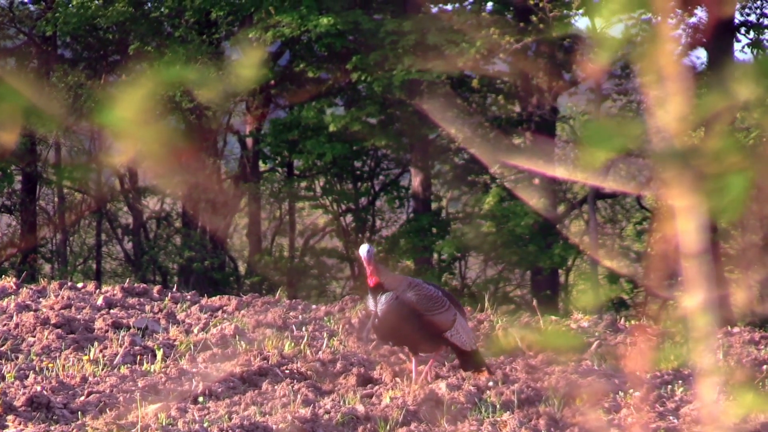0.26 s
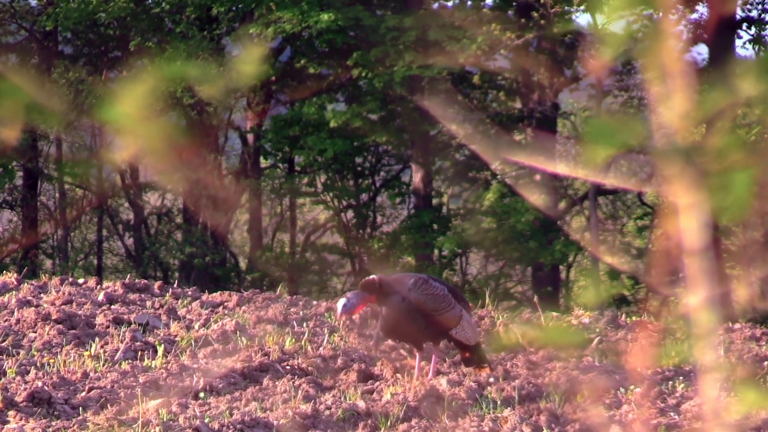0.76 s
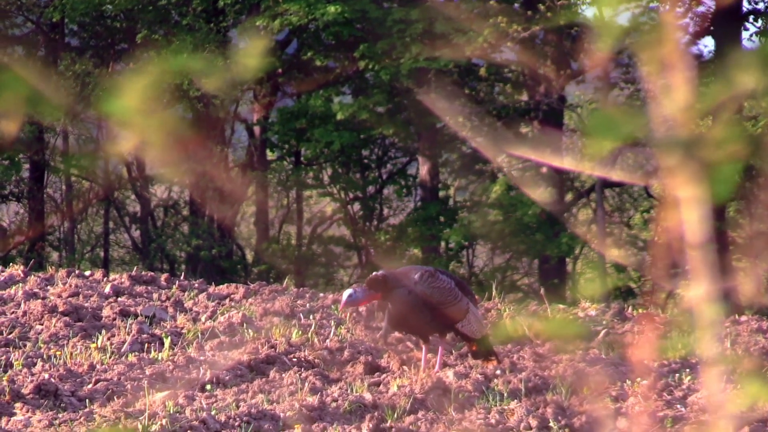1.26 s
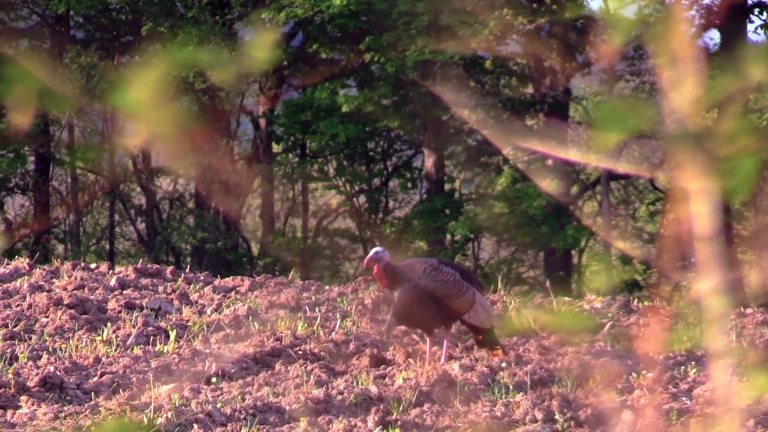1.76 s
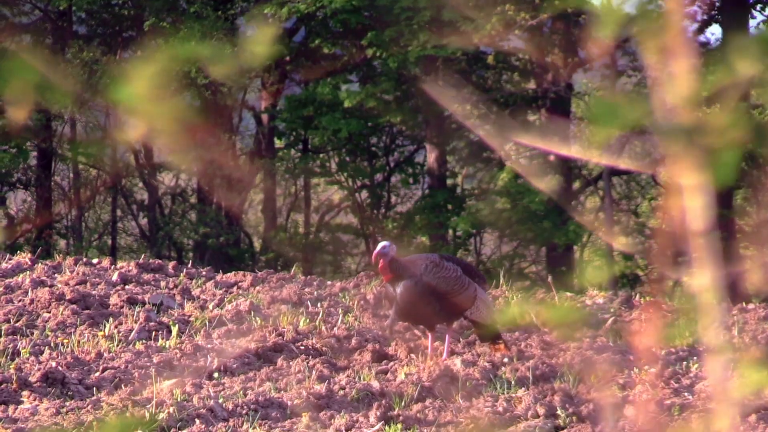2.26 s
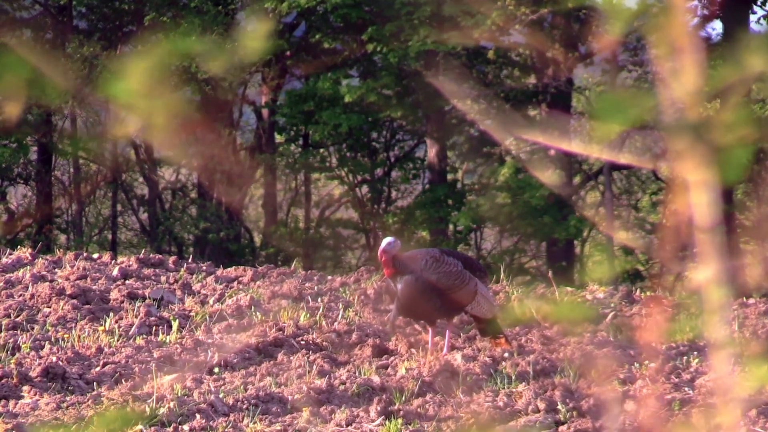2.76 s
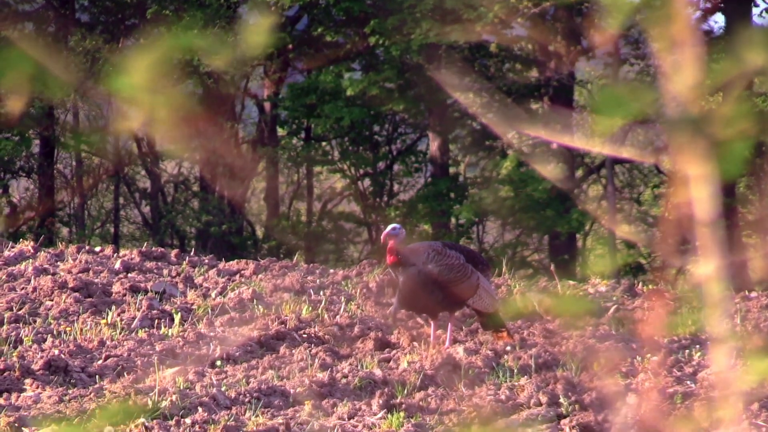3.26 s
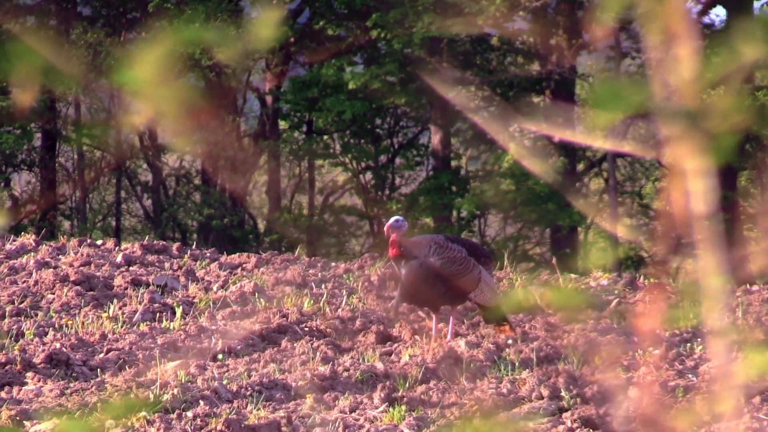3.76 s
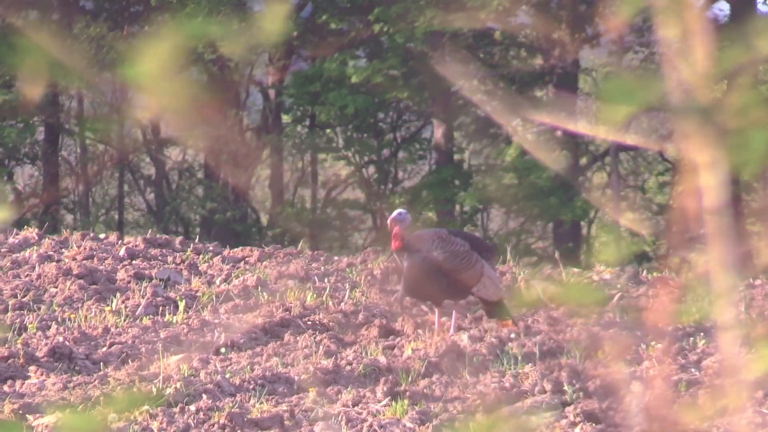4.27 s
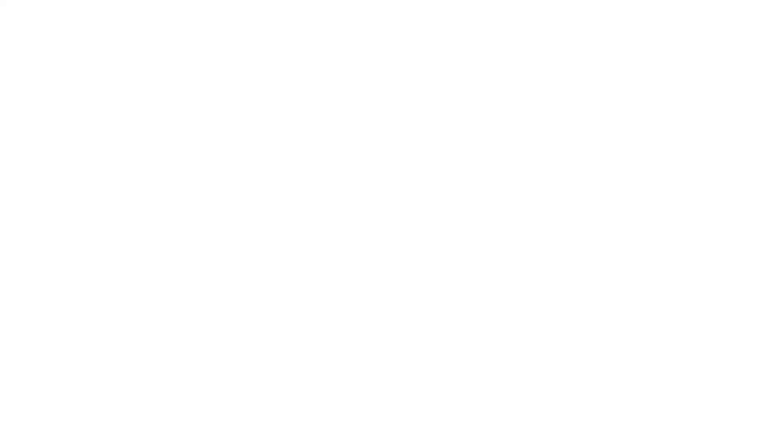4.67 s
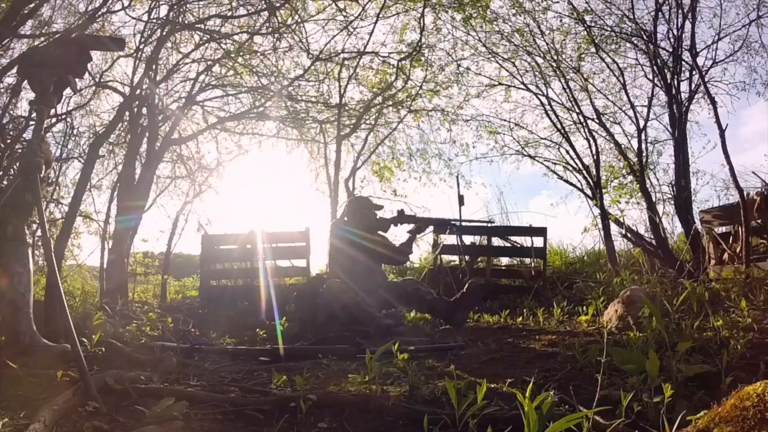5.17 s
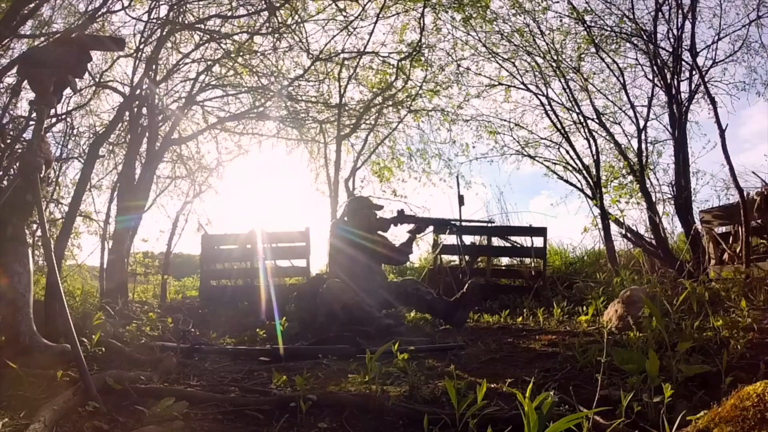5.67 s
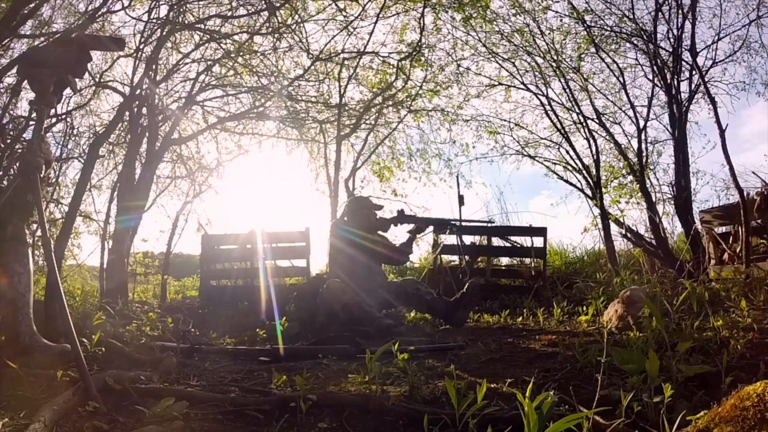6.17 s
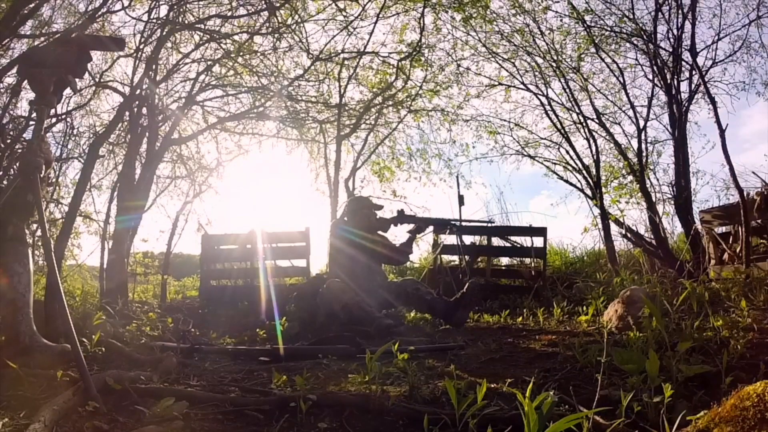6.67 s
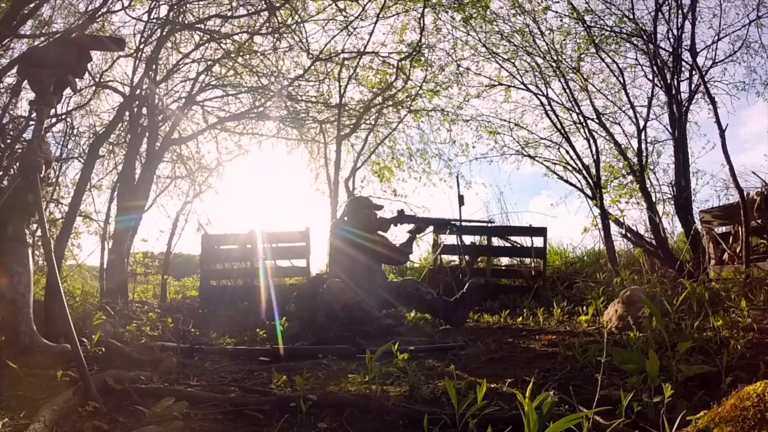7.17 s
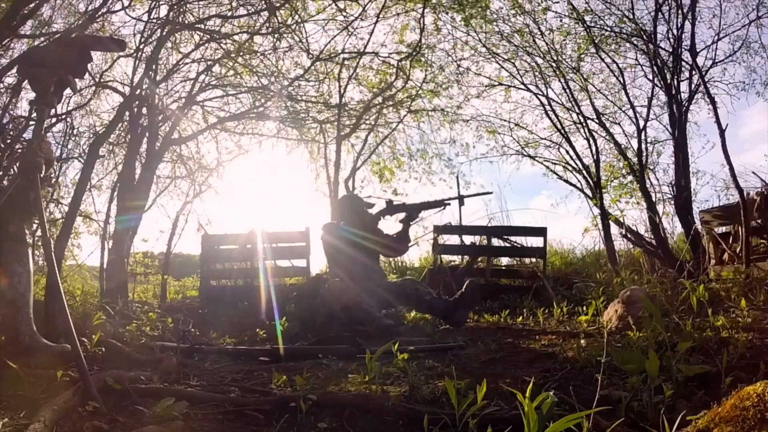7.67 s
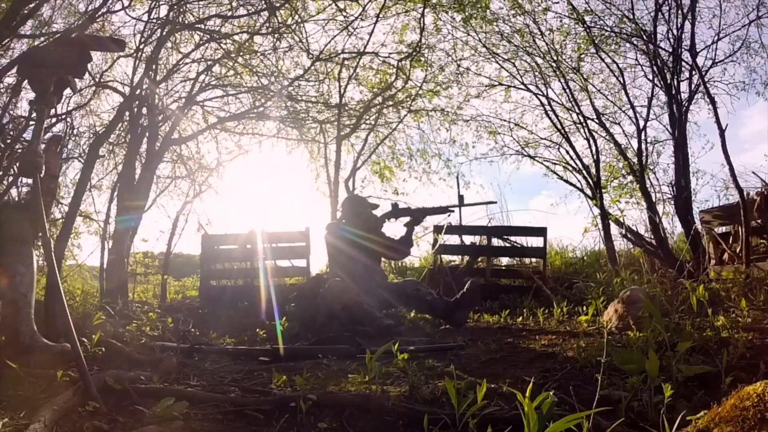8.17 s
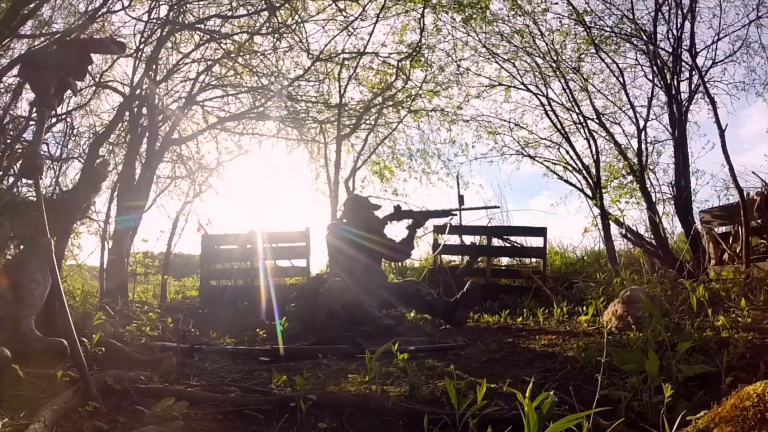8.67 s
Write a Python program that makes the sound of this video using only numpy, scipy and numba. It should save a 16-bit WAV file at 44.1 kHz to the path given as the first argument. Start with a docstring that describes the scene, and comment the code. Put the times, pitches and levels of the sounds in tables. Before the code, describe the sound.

Outdoors, thin birdsong sits behind gusty low wind. A strong turkey gobble starts raspy and breaks into quick fading syllables; a close bird follows with fluty notes and a loud coarse trill. Wind and distant chirps resume, crossfading to dull, steady air noise. Then a very short, dry shot snaps, leaving a near-hush, soft rustle, ringing metallic clicks and thudding handling bumps close to the microphone.

```python
"""Wind rumbles and far songbirds whistle at the edge of a wood; a turkey gobbles, then a near blackbird sings and trills.
The sound fades to a second, hissier spot: a shot cracks, the background sinks and creeps back,
the gun's action clinks and the microphone is jostled. Backgrounds are filtered noise, birdsong is gliding sines,
the gobble and trill are pulse trains through resonances, the clinks are noise that excites damped modes."""
import sys
import numpy as np
from scipy import signal
from scipy.fft import rfft, irfft, next_fast_len
from scipy.io import wavfile
from scipy.ndimage import uniform_filter1d
from numba import njit

SR = 44100
rng = np.random.default_rng(int(sys.argv[2]) if len(sys.argv) > 2 else 0)


def generate_wav(signal):
    """Clip the signal to [-1, 1] and save it as 16-bit WAV at the path in sys.argv[1]."""
    frames = np.transpose(np.atleast_2d(signal))
    scaled = np.clip(frames, -1, 1) * 32767
    pcm = np.round(scaled).astype(np.int16)
    wavfile.write(sys.argv[1], SR, pcm)


N = 393813

# Background of the first spot, sinking under the loud calls and creeping back.
# Each row: time in seconds, murmur level in dB, hiss level in dB.
WOOD = [(0.0, -37.5, -49.5), (0.6, -34, -44.5), (0.72, -38, -51), (1.23, -37, -52.5), (1.55, -33.5, -48),
        (2.12, -29.5, -43), (2.55, -27.5, -41), (2.87, -45, -52.5), (3.11, -50, -54.5), (3.6, -44.5, -55.5),
        (3.93, -33, -47.5), (4.2, -32, -43.5), (4.56, -31.5, -43.5), (5.1, -39, -53)]
# Spectrum of the low murmur at both spots. Each row: frequency in Hz, level in dB per Hz.
MURMUR_COLOUR = [(120, -55), (200, -6), (302, -6), (377, -2.5), (1460, -15.5), (2500, -31.5), (3250, -43),
                 (5500, -120)]


def from_db(db):
    """Decibels are logarithmic: 20 dB is a factor of ten in amplitude."""
    return 10 ** (np.asarray(db) / 20)


def rms_one(x):
    """Normalization of the mean power: scale to rms 1."""
    return x / np.sqrt(np.mean(x ** 2) + 1e-20)


def span(rows):
    """Linear interpolation of breakpoints: first sample, columns per sample, short fade at both ends."""
    s, *columns = np.transpose(rows)
    start, stop = round(s[0] * SR), min(round(s[-1] * SR), N)
    t = np.arange(start, stop) / SR
    fade = np.clip(np.minimum(t - t[0], t[-1] - t) / 0.0013, 0, 1)
    return start, [np.interp(t, s, c) for c in columns], fade


def add(out, start, x):
    """Superposition: mix x into out from sample start on."""
    out[start:start + len(x)] += x[:N - start]


def drift(rate, size):
    """Band-limited random fluctuation: random knots, 2 * rate per second, joined by lines; rms 1."""
    knots = rng.standard_normal(int(size * 2 * rate / SR) + 2)
    return rms_one(np.interp(np.arange(size) * 2 * rate / SR, np.arange(len(knots)), knots))


def coloured(spectrum, size, patchy_db):
    """Spectral shaping: white noise is weighted per frequency, then flickers slowly; rms 1."""
    hz, db = np.transpose(spectrum)
    padded = next_fast_len(size)
    grid = np.maximum(np.arange(padded // 2 + 1) * SR / padded, 1)
    gain = from_db(np.interp(np.log(grid), np.log(hz), db, left=-200, right=-200))
    noise = irfft(rfft(rng.standard_normal(padded)) * gain, padded)[:size]
    return rms_one(noise * from_db(patchy_db * drift(9, size)))


def bed(rows, *colours, patchy_db):
    """Stationary noise under a level envelope: one coloured noise for each level column."""
    out = np.zeros(N)
    start, levels, _ = span(rows)
    for db, colour in zip(levels, colours):
        add(out, start, from_db(db) * coloured(colour, len(db), patchy_db))
    return out


@njit
def resonate(x, hz, width, sr):
    """Second-order resonance of gain 1 whose centre may move; its bandwidth sets the damping."""
    out, r = np.zeros(len(x)), np.exp(-np.pi * width / sr)
    for i in range(2, len(x)):
        drive = (1 - r * r) / 2 * (x[i] - x[i - 2])
        out[i] = drive + 2 * r * np.cos(2 * np.pi * hz[i] / sr) * out[i - 1] - r * r * out[i - 2]
    return out


def modes(x, table, order=1):
    """Modal superposition: parallel resonances of alternating sign; order 2 darkens the valleys."""
    out = 0
    for k, (hz, width, db) in enumerate(table):
        r, ring = np.exp(-np.pi * width / SR), x
        feedforward = [(1 - r * r) / 2, 0, (r * r - 1) / 2]
        feedback = [1, -2 * r * np.cos(2 * np.pi * hz / SR), r * r]
        for _ in range(order):
            ring = signal.lfilter(feedforward, feedback, ring)
        out = out + (-1) ** k * from_db(db) * ring
    return out


def pulses(per_s, rough, weak):
    """Period-doubled excitation: jittered strong-weak pulses plus breath noise that throbs with them."""
    size = len(per_s)
    cycles = np.cumsum(per_s * (1 + .12 * rough * drift(120, size))) / SR
    at = np.flatnonzero(np.diff(np.floor(cycles))) + 1
    shimmer = from_db(2.2 * rough[at] * rng.standard_normal(len(at)))
    train = np.zeros(size)
    train[at] = np.where(np.arange(len(at)) % 2, weak, 1) * shimmer
    breath = rng.standard_normal(size) * np.exp(-3 * (cycles % 1))
    return np.sqrt(1 - rough ** 2) * rms_one(train) + rough * rms_one(breath)


def evened(x, seconds):
    """Short-time power normalization: level held near rms 1."""
    return x / np.sqrt(uniform_filter1d(x ** 2, round(seconds * SR)) + 1e-12)


def sine(hz):
    """Phase is the running integral of frequency, so the pitch may glide."""
    return np.sin(np.cumsum(hz) * 2 * np.pi / SR)


def arch(s, top_s, end_s, db, onset_db, end_db, start_hz, top_hz, end_hz):
    """Note envelope: first sample, gliding pitch and gain with a rounded swell and fall in dB."""
    start, (hz, away, drop_db), fade = span([
        (s, start_hz, 1, onset_db), (top_s, top_hz, 0, onset_db),
        (top_s + 1e-4, top_hz, 0, end_db), (end_s, end_hz, 1, end_db)])
    return start, hz, from_db(db - drop_db * away ** 1.2) * fade


def trees(x, wet_db):
    """Multiple scattering: trunks and leaves add a short, exponentially decaying noise tail."""
    t60_s = 0.15
    t = np.arange(round(.4 * SR)) / SR
    tail = rng.standard_normal(len(t)) * from_db(-60 * t / t60_s) * (t > .004)
    tail = tail / np.sqrt(np.sum(tail ** 2))
    return x + from_db(wet_db) * signal.fftconvolve(x, tail)[:N]


def crack(db, t60, hz):
    """Impulsive noise: a burst around a centre frequency swells within 3.1 ms and decays exponentially."""
    t = np.arange(round(.12 * SR)) / SR
    noise = rng.standard_normal(len(t))
    noise = rms_one(resonate(noise, np.full(len(t), hz * 1.), hz * 0.26, SR)) + 0.046 * noise
    return from_db(db + 2 - 60 * t / t60) * np.minimum(t / 0.0031, 1) * noise


def following(offset_db, share, at_db):
    """Proportional level tracking: offset_db at murmur at_db, then share dB per dB of murmur."""
    return [(s, offset_db + share * (db - at_db)) for s, db, _ in WOOD]


def chorus_level():
    """Distant calls blend into a diffuse field: its level goes dB for dB with the murmur."""
    return following(-36, 1, at_db=-30.5)


def wood_background():
    """Diffuse sound of the first spot: murmur, hiss and a far blur of birds as shaped noise."""
    # Each row: frequency in Hz, level in dB per Hz.
    hiss_colour = [(2650, -34.5), (4500, 1), (6310, -4), (8520, -6), (15200, -7.5), (15900, -22)]
    chorus_colour = [(1060, -26), (1800, 1), (2820, 8), (3340, 5), (4300, -2), (4820, -14.5), (5200, -14),
                     (6760, -92), (11400, -120)]
    out = bed(WOOD, MURMUR_COLOUR, hiss_colour, patchy_db=.6)
    return out + bed(chorus_level(), chorus_colour, patchy_db=1)


def second_background():
    """Diffuse sound of the second spot: shaped noise fades in; echoes and rustle follow the shot."""
    # Noise before the shot. Each row: time in seconds, level in dB.
    blind = [(4.5, -42), (5.2, -29), (7.33, -29)]
    # After the shot. Each row: time in seconds, echoes and rustle in dB, low murmur in dB.
    aftermath = [(7.345, -28.5, -48), (7.415, -46.5, -60), (7.495, -37, -62), (7.605, -49.5, -61.5),
                 (7.953, -38, -40.5), (8.213, -33, -34.5), (8.755, -37, -35), (8.93, -47.5, -44)]
    # Spectra. Each row: frequency in Hz, level in dB per Hz.
    blind_colour = [(88, -38), (150, -2), (1310, -13), (2350, -17), (2850, -18), (4740, -22.5),
                    (14400, -38.5), (15900, -57)]
    aftermath_colour = [(590, -52), (1000, -17), (1340, -5), (1480, -3.5), (1760, -1), (2330, -3.5),
                        (2930, -2.5), (4010, -11.5), (6370, -17.5), (12300, -30.5), (15900, -46)]
    out = bed(blind, blind_colour, patchy_db=.5)
    return out + bed(aftermath, aftermath_colour, MURMUR_COLOUR, patchy_db=1.9)


def side_hiss():
    """Opposite polarity in the two channels: a patchy treble hiss, 1.8 dB per dB of murmur."""
    # Each row: frequency in Hz, level in dB per Hz.
    side_colour = [(2350, -47.5), (4000, -27), (5250, -3), (6270, -1), (12800, -1), (15900, -1.5)]
    hiss = bed(following(-47, 1.8, at_db=-31.5), side_colour, patchy_db=5.5)
    return hiss * np.array([[1], [-1]])


def wind():
    """Wind turbulence on the microphone: low-frequency noise whose level comes and goes."""
    # Each row: time in seconds, level in dB.
    gusts = [(0.0, -8.5), (0.02, -13.5), (0.34, -13), (0.5, -19.5), (0.54, -14.5), (0.86, -26),
             (0.92, -15.5), (1.1, -22), (1.53, -16.5), (1.89, -20.5), (1.91, -16), (2.28, -22), (2.52, -21),
             (3.02, -44.5), (3.47, -42), (3.88, -27), (4.51, -19.5), (4.65, -28), (4.69, -21.5),
             (4.94, -31), (7.29, -33), (7.33, -17), (7.38, -51), (8.1, -36.5)]
    # Each row: frequency in Hz, level in dB per Hz.
    wind_colour = [(12, -58), (20, -8.5), (60, 2), (134, -4), (198, -7.5), (285, -18), (400, -28.5),
                   (520, -33), (880, -120)]
    return bed(gusts, wind_colour, patchy_db=0.9)


def jostle():
    """Structure-borne sound: bumps to the microphone give bursts of low-frequency noise."""
    # Each row: time in seconds, level in dB.
    bumps = [(8.05, -40), (8.102, -39), (8.208, -25), (8.304, -34), (8.53, -15), (8.566, -20.5),
             (8.59, -27), (8.65, -27), (8.678, -16.5), (8.758, -26), (8.792, -11), (8.876, -11.5),
             (8.93, -16)]
    # Each row: frequency in Hz, level in dB per Hz.
    jostle_colour = [(18, -45), (30, -27), (76, 4), (113, -4), (139, 1.5), (167, -7.5), (189, -15),
                     (216, -15.5), (350, -34), (460, -67), (770, -120)]
    return bed(bumps, jostle_colour, patchy_db=0.0)


def twigs():
    """Impulsive excitation: faint dry ticks as brief noise bursts."""
    out = np.zeros(N)
    # Each row: start in seconds, level in dB.
    ticks = [(0.4727, -33), (1.9057, -27.5), (2.0856, -30.5), (3.9545, -28)]
    for s, db in ticks:
        add(out, round(s * SR), crack(db, 0.03, 5500))
    return out


def twitter():
    """Random superposition: many faint gliding chirps, tied to the level of the far blur of birds."""
    out = np.zeros(N)
    start, (db,), _ = span(chorus_level())
    for when, pitch, bend, length, faintness in rng.random((130, 5)):
        at, steps = int(when * len(db)), round((0.0188 + 0.039 * length) * SR)
        hz = 2400 + 2200 * pitch + 1600 * (bend - .6) * np.linspace(-.5, .5, steps)
        gain = from_db(db[at] + 1 - 9 * faintness)
        add(out, start + at, gain * sine(hz) * np.hanning(steps))
    return out


def whistles():
    """Nearly pure tones: short gliding sines with a wobbling level."""
    out = np.zeros(N)
    # Each row: start in seconds, length in seconds, nominal peak rms in dB,
    # pitch in Hz at start, middle and end.
    whistle_rows = [(0.06, 0.048, -45, 2250, 2470, 2600), (0.138, 0.065, -38, 2580, 2830, 2780),
                    (0.1, 0.071, -43, 2250, 2265, 2279), (0.295, 0.068, -42, 2850, 2670, 2738),
                    (0.335, .2, -38, 3800, 3150, 2450), (0.38, 0.04, -35, 2440, 2580, 2610),
                    (0.512, 0.064, -31.5, 2600, 2800, 2820), (1.3, 0.15, -43, 3050, 2650, 2380),
                    (1.69, 0.026, -35.5, 4140, 4230, 4250), (1.72, 0.054, -36, 2200, 2250, 1610),
                    (1.74, 0.049, -38.5, 3800, 3900, 4200), (1.94, .035, -30, 3000, 2790, 2700),
                    (2.0, .05, -37, 3900, 4340, 4400), (1.735, 0.051, -32, 3080, 2740, 2650),
                    (1.795, 0.17, -32.5, 2570, 2050, 1970), (1.83, 0.038, -39, 5100, 4440, 4360),
                    (1.92, 0.071, -30.5, 4060, 3630, 2810), (2.055, 0.056, -40, 2390, 2470, 2430),
                    (2.12, 0.029, -28, 3250, 3500, 3460), (2.12, .19, -28, 3010, 2245, 1990),
                    (2.185, 0.031, -27.5, 3660, 3430, 3400), (2.22, 0.062, -27, 2920, 2420, 2830),
                    (2.295, 0.031, -21.5, 3270, 3440, 3560), (2.44, .06, -31.5, 1900, 1700, 1470),
                    (3.76, .04, -35, 3630, 3300, 2970), (3.81, .05, -33, 3080, 3150, 3100),
                    (3.865, .06, -38.5, 3220, 3070, 3000), (4.0, 0.14, -33.5, 2490, 2476, 2660),
                    (4.381, 0.083, -35, 5530, 4510, 3480), (4.535, 0.053, -32, 4800, 3800, 3040),
                    (4.245, 0.027, -42, 3600, 3300, 3000), (4.68, .13, -40, 2165, 2170, 2150),
                    (4.73, .07, -42, 3600, 3100, 2530), (4.79, 0.076, -39, 2300, 2500, 2650),
                    (4.8, .16, -47, 3350, 3410, 3620)]
    for s, length, db, *pitches in whistle_rows:
        # starts 4 dB and ends 7 dB under the peak
        start, hz, gain = arch(s, s + length / 2, s + length, db, 4, 7, *pitches)
        wobble = from_db(2.5 * drift(40, len(hz)))
        add(out, start, np.sqrt(2) * sine(hz) * wobble * gain)
    return out


def warbles():
    """Frequency modulation: a plain low note leaps up, then periodic dips in pitch deepen."""
    lead_s, leap_s, settle_s = 0.033, 0.0145, 0.079
    lead_start_hz, lead_end_hz, leap_hz, warble_hz = 1014, 1085, 1600, 1710
    dips_per_s, lead_db = 27, 3.5
    out = np.zeros(N)
    # Each row: start in seconds, length in seconds, level in dB, depth of the pitch dips in Hz.
    warble_rows = [(2.101, .33, -35.5, 401), (4.179, .32, -31, 608)]
    for s, length, db, depth_hz in warble_rows:
        leap = s + lead_s + leap_s
        start, (hz, level, dip_hz), fade = span([
            (s, lead_start_hz, db - 1, 0), (s + lead_s, lead_end_hz, db + lead_db, 0),
            (leap, leap_hz, db, 100), (leap + settle_s, warble_hz, db, depth_hz),
            (s + length, warble_hz, db - 3, depth_hz)])
        dips = np.sin(np.arange(len(hz)) * dips_per_s * np.pi / SR) ** 4
        pitch = hz - dip_hz * dips + 60 * drift(80.1, len(hz))
        add(out, start, np.sqrt(2) * sine(pitch) * from_db(level) * fade)
    return out


def chips():
    """Downward chirp: a high pitch falls fast while random frequency modulation makes it hoarse."""
    length_s, start_hz, end_hz = 0.033, 7840, 5140
    out, size = np.zeros(N), round(length_s * SR)
    # Each row: start in seconds, peak amplitude in dB.
    chip_rows = [(3.884, -37.5), (3.96, -44), (4.04, -40), (4.139, -35), (4.234, -37), (4.51, -36),
                 (4.6, -33), (4.751, -33), (4.856, -41)]
    for s, db in chip_rows:
        pitch = np.linspace(start_hz, end_hz, size) + 500 * drift(417, size)
        add(out, round(s * SR), from_db(db) * sine(pitch) * np.hanning(size) ** .5)
    return out


def songbirds():
    """Scattering in the wood: the far birds share one tail."""
    return trees(whistles() + warbles() + chips() + twitter(), wet_db=-6)


def blackbird_notes():
    """Phase modulation: a second voice flutters the first, giving side lines around gurgling notes."""
    out = np.zeros(N)
    # Each row: start, loudest moment and end in seconds, peak rms of the fundamental in dB,
    # start below the peak in dB, pitch in Hz at start, loudest and end,
    # flutter rate in Hz, flutter depth in rad, overtones in dB, hoarseness in rad.
    notes = [(2.469, 2.508, 2.595, -10.5, 12, 1080, 1058, 1087, 390, 0.027, -26, .03),
             (2.584, 2.641, 2.654, -7, 30, 1563, 1513, 1480, 328, .1, -23.5, 0.22),
             (2.65, 2.656, 2.68, -6, 8, 1493, 1495, 1540, 332, 0.14, -29, 0.24),
             (2.663, 2.685, 2.76, -32, 6, 1630, 1620, 1676, 400, .1, -14, .1),
             (2.647, 2.679, 2.705, -25, 11, 1344, 1260, 1250, 406, .1, -12, .1),
             (2.7, 2.745, 2.785, -20.5, 20, 5120, 5290, 5280, 423, 0.8, -49, 0.36),
             (2.747, 2.782, 2.81, -9, 23, 2700, 2552, 2440, 300, 0.58, -38, 0.355),
             (2.795, 2.816, 2.85, -12.5, 4.7, 2460, 2550, 2410, 300, .48, -35, 1),
             (2.841, 2.865, 2.885, -6.5, 7.7, 2042, 2223, 2300, 425, .24, -33.5, 0.098),
             (2.872, 2.903, 2.94, -16.5, 3, 2266, 2393, 2490, 426, .6, -33, .12),
             (2.839, 2.843, 2.875, -11.5, 6.5, 1703, 1777, 1870, 425, .1, -26.5, 0.3),
             (2.876, 2.9, 2.94, -7, 29, 4236, 4224, 4420, 445, 1.27, -49, 0.37)]
    for s, top_s, end_s, db, onset_db, *pitches, flutter_hz, depth, over_db, hoarse in notes:
        start, hz, gain = arch(s, top_s, end_s, db, onset_db, 19, *pitches)   # ends 19 dB down
        flutter = sine(flutter_hz * (1 + 0.041 * drift(60, len(hz))))
        phase = np.cumsum(hz) * 2 * np.pi / SR + depth * flutter + hoarse * drift(300, len(hz))
        overtones = np.sin(2 * phase) + np.sin(3 * phase) + np.sin(4 * phase)
        add(out, start, np.sqrt(2) * (np.sin(phase) + from_db(over_db) * overtones) * gain)
    return out


def blackbird_trill():
    """Source and filter: fast pulses buzz through beak resonances that wander and swell."""
    start_per_s, end_per_s, rough, weak = 324, 304, .35, .5   # pulse rates, roughness 0-1, weak share
    # Each row: time in seconds, level in dB.
    trill = [(2.935, -8.5), (2.945, -11.5), (3.07, -14), (3.396, -12), (3.48, -16), (3.56, -15), (3.6, -33)]
    # Each row: mean frequency in Hz, width in Hz, mean gain in dB.
    beak = [(2460, 180, -13.5), (2750, 94, -1.5), (3014, 108, 4), (3220, 150, -1.5), (3477, 150, 1.5),
            (4110, 110, -10), (4680, 300, -13), (5000, 640, -17.5)]
    out = np.zeros(N)
    start, (db,), fade = span(trill)
    size = len(db)
    beats = pulses(np.linspace(start_per_s, end_per_s, size), np.full(size, rough), weak)
    shifting = 0
    for k, (hz, width, gain_db) in enumerate(beak):   # the beak moves each resonance on its own
        gain = (-1) ** k * from_db(gain_db + 1.5 * drift(20, size))
        centre = hz * (1 + .015 * drift(40, size))
        shifting = shifting + gain * resonate(beats, centre, width, SR)
    band = signal.butter(8, [2100, 5500], "band", fs=SR, output="sos")
    faint_lows = from_db(-35.5) * modes(beats, [(1420, 410, 0.008), (1920, 400, 0.0086)])
    buzz = signal.sosfilt(band, shifting) + faint_lows
    add(out, start, evened(buzz, 0.009) * from_db(db) * fade)
    return out


def blackbird():
    """Scattering in the wood: notes and trill share one tail."""
    return trees(blackbird_notes() + blackbird_trill(), wet_db=-6.0)


def shot():
    """Impulsive noise: hammer and muzzle crack as two decaying bursts."""
    out = np.zeros(N)
    # Each row: start in seconds, level in dB, 60 dB decay time in seconds, centre in Hz.
    cracks = [(7.327, -3, 0.018, 4560), (7.331, 1, 0.034, 2600)]
    for s, db, t60, hz in cracks:
        add(out, round(s * SR), crack(db, t60, hz))
    return out


def gun_action():
    """Modal excitation: rattling metal contacts ring the action's modes, each in its own balance."""
    ring_limit_s = 0.069   # the grip damps the ringing
    # Each row: start in seconds, level in dB, time for the rattle to fall 20 dB in seconds,
    # ringing over the scrape in dB.
    clinks = [(7.927, -31, .017, 16), (8.066, -31.5, .026, 19), (8.091, -22, 0.038, 25),
              (8.212, -36.5, 0.018, 32), (8.256, -26.5, 0.038, 26), (8.2876, -19, 0.029, 25),
              (8.464, -31, .02, 12), (8.513, -31, .022, 18), (8.7, -23, 0.022, 1), (8.754, -24, 0.03, 9),
              (8.774, -19.5, 0.012, 14), (8.817, -29, 0.018, 12)]
    # Each row: frequency in Hz, mean level in dB, undamped 60 dB decay time in seconds.
    action_modes = [(1695, 0.5, 0.064), (2905, 3.5, 0.09), (3700, -1, 0.055), (4750, -9, 0.019),
                    (5020, -11, 0.056), (6270, -16, 0.05)]
    out, t = np.zeros(N), np.arange(round(.2 * SR)) / SR
    wide = signal.butter(2, [900, 6000], "band", fs=SR, output="sos")
    for s, db, length, ring_db in clinks:
        uneven = from_db(2 * drift(300, len(t)))   # contacts come in clumps
        envelope = from_db(db - 20 * t / length) * np.minimum(t / .002, 1)
        touches = envelope * uneven * rng.standard_normal(len(t))
        struck = []
        for hz, mode_db, t60 in action_modes:
            width = np.log(1000) / np.pi / min(t60, ring_limit_s)   # bandwidth from decay time
            struck.append((hz, width, mode_db + ring_db + 2 * rng.standard_normal()))
        scrape = signal.sosfilt(wide, touches)
        add(out, round(s * SR), modes(touches, struck) + scrape)
    return out


def turkey():
    """Source and filter: rough pulses excite a long throat whose lower resonances shift in each syllable."""
    # Each row: start, loudest moment and end in seconds, peak level in dB, onset below the peak in dB,
    # first and second throat resonance in Hz, share by which the first sinks after the peak,
    # second resonance in dB, upper throat in dB, pulses per second,
    # share by which pulses and second resonance start higher, weak pulse share, roughness 0-1.
    gobble = [(0.678, 0.712, 0.74, -9, 3, 890, 1400, 0, 14.5, -0.5, 324.5, -0.036, .87, 0.62),
              (0.747, 0.789, 0.835, -6.5, 16, 940, 1390, .05, 14, -2, 334, -.03, 1, 0.59),
              (0.804, 0.826, 0.855, -17.5, 3, 790, 1910, .1, -6, -11, 332.5, 0.014, 0.8, 0.57),
              (0.866, 0.883, 0.905, -26, 1, 920, 1270, 0, 6, 2, 344, 0.0054, .87, 0.73),
              (0.917, 0.974, 0.99, -12, 13.3, 1100, 2000, -0.029, -5, -9, 339.7, -0.039, 0.72, .25),
              (0.984, 1.032, 1.065, -9, 14, 1130, 1850, 0.059, 3, -2, 360.6, 0.084, 0.72, 0.31),
              (1.09, 1.101, 1.11, -22, 1, 964, 1800, 0, 0, -4, 350, .01, .87, .3),
              (1.11, 1.141, 1.175, -9.5, 13.4, 1050, 1770, 0.066, -5, -5.5, 348.5, 0.0031, .9, 0.26),
              (1.172, 1.218, 1.235, -12.5, 11.5, 990, 1800, 0.077, -3, -3.5, 360.6, .04, 0.6, 0.3),
              (1.263, 1.295, 1.315, -19, 8.5, 870, 1740, 0.017, -13.5, -13, 590, .01, 0.25, .2),
              (1.355, 1.384, 1.415, -15.5, 1, 910, 1750, 0.043, -4.5, -4.5, 589, .02, 0.45, 0.26),
              (1.434, 1.483, 1.5, -17, 6.3, 870, 1740, -0.07, -8, -8.5, 596, -0.027, 0.36, 0.32),
              (1.527, 1.563, 1.58, -17.5, 1, 900, 1780, 0, -1.5, -6, 595, -0.013, 0.63, 0.25),
              (1.604, 1.614, 1.65, -19.5, 1, 880, 1760, 0, -3, -5.5, 583, 0.0062, 0.58, 0.18)]
    # Each row: frequency in Hz, width of one pass in Hz, gain of the doubled filter in dB.
    upper_throat = [(653, 85, -8.5), (1925, 100, 0.5), (2340, 240, -4), (2960, 930, -4), (3553, 280, 2.5),
                    (4060, 550, -8.5), (4840, 230, -21), (5560, 890, -17)]
    first_width_hz, second_width_hz = 295, 350   # before the scaling by roughness
    onset_s, edge_db = 0.0099, 27.5   # quick onset, then a swell; both ends lie edge_db under the peak
    mouth = signal.butter(4, 5000, fs=SR, output="sos")   # little gets out above the throat
    out = np.zeros(N)
    for (s, top_s, end_s, db, onset_db, first_hz, second_hz, sink,
         second_db, upper_db, per_s, glide, weak, rough) in gobble:
        start, (level, gone, bend), fade = span([
            (s, db - edge_db, 0, 1 + glide),
            (min(s + onset_s, top_s - .001), db - onset_db, 0, 1 + glide),
            (top_s, db, 0, 1), (end_s, db - edge_db, 1, 1 - glide / 2)])
        source = pulses(per_s * bend, np.full(len(level), rough), weak)
        first, second = source, source
        widening = .5 + 2 * rough ** 2   # rasping syllables ring broader
        for _ in range(2):   # twice through each resonance keeps the valleys dark
            first = resonate(first, first_hz * (1 - sink * gone), widening * first_width_hz, SR)
            second = resonate(second, second_hz * bend, widening * second_width_hz, SR)
        upper = modes(source, upper_throat, order=2)
        voice = first - from_db(second_db) * second + from_db(upper_db) * upper
        voice = signal.sosfilt(mouth, voice)
        add(out, start, evened(voice, 0.0033) * from_db(level) * fade)
    return trees(out, wet_db=-13.5)


def scene():
    """Superposition: all sources in the middle, but for the treble hiss that differs between the ears."""
    mid = wood_background() + second_background() + wind() + jostle()
    mid = mid + twigs() + songbirds() + blackbird() + shot() + gun_action() + turkey()
    return mid + side_hiss()


def record(dry):
    """Soft saturation and band limiting: the highest peaks are rounded, the top is cut."""
    rounded = dry / (1 + np.abs(dry) ** 8) ** (1 / 8)
    cutoff_hz = 16100   # 70 dB down from here on
    return signal.sosfilt(signal.cheby2(12, 70, cutoff_hz, fs=SR, output="sos"), rounded)


dry = scene()
out = record(dry)
generate_wav(out)
```